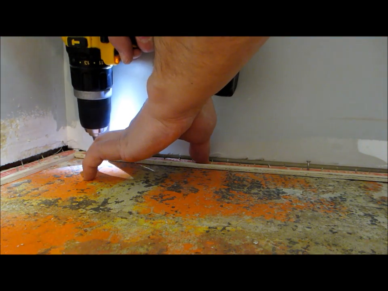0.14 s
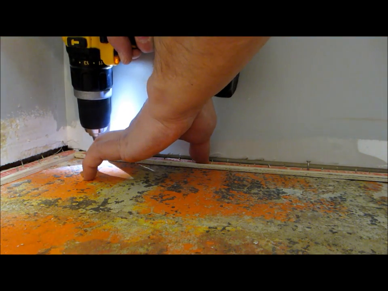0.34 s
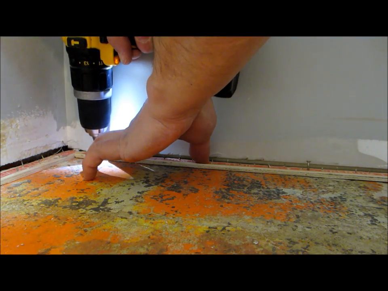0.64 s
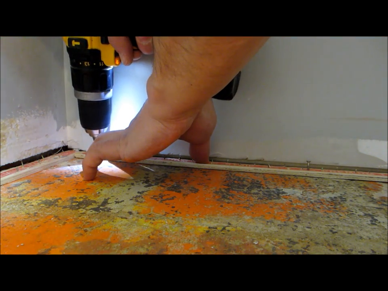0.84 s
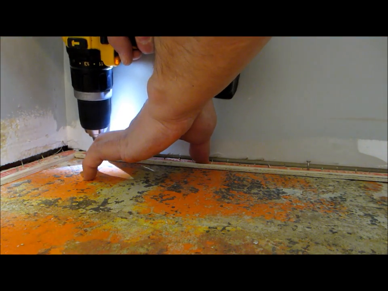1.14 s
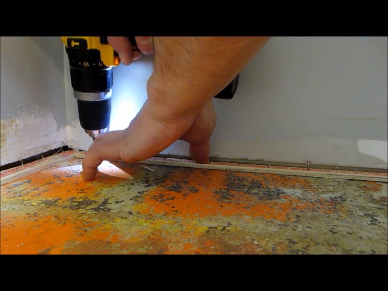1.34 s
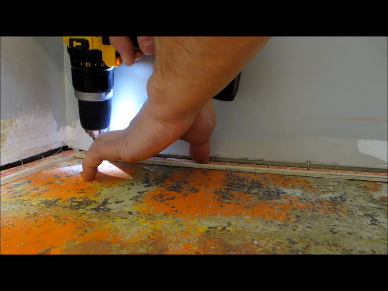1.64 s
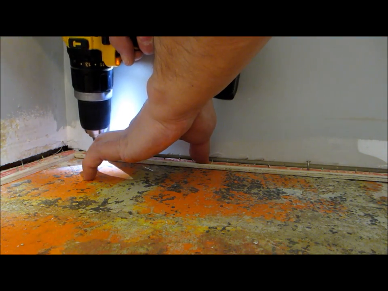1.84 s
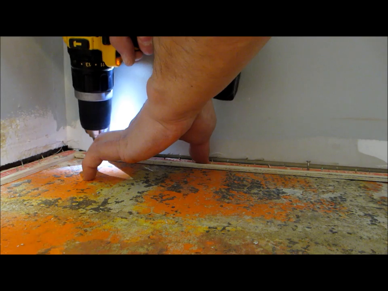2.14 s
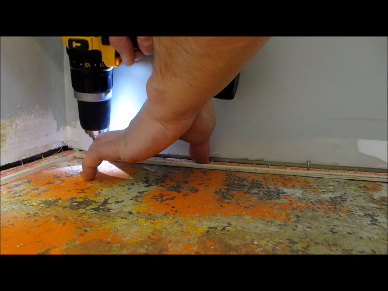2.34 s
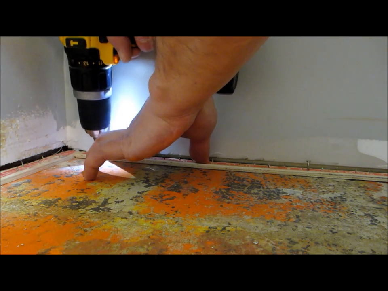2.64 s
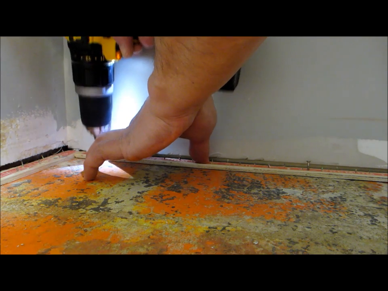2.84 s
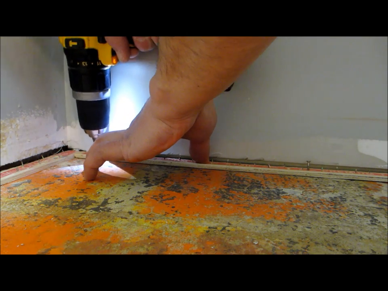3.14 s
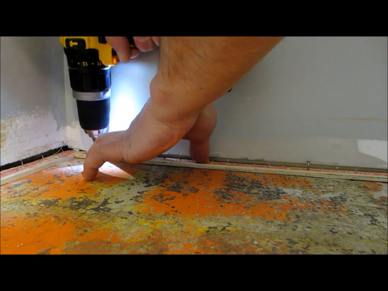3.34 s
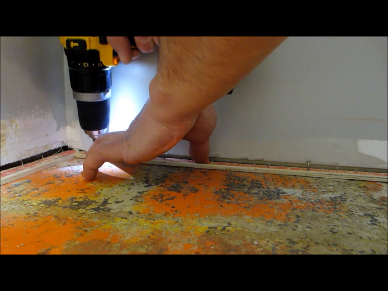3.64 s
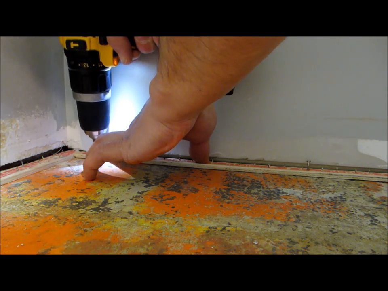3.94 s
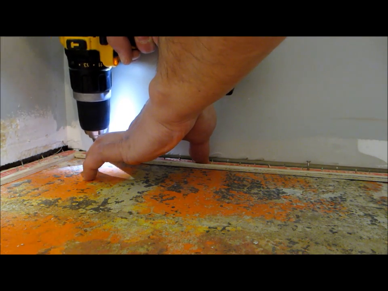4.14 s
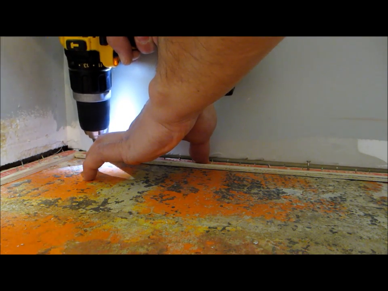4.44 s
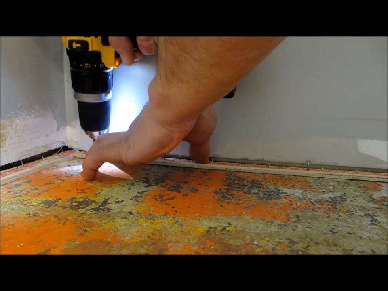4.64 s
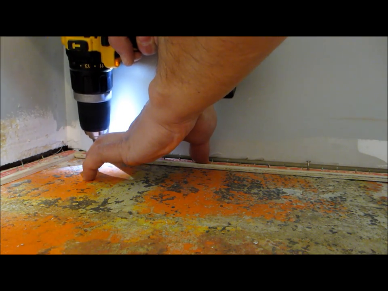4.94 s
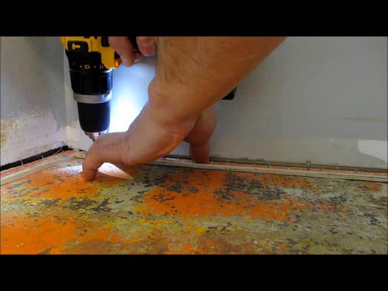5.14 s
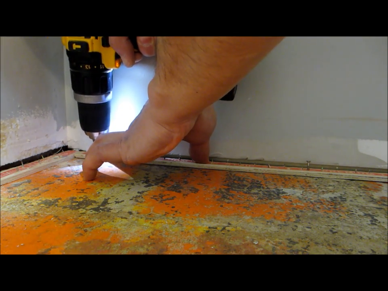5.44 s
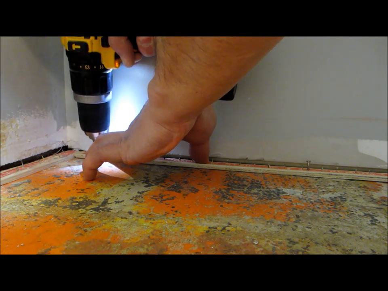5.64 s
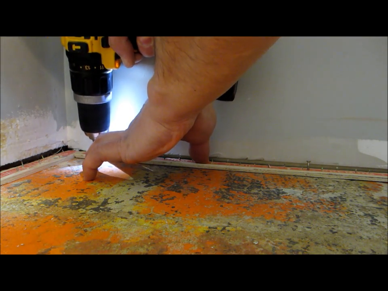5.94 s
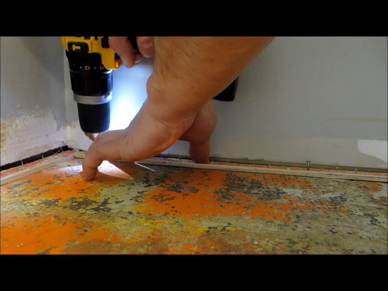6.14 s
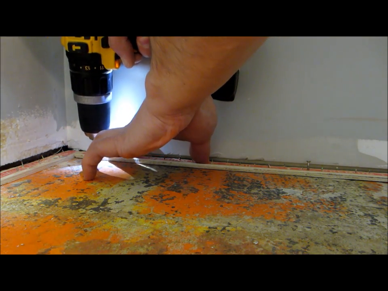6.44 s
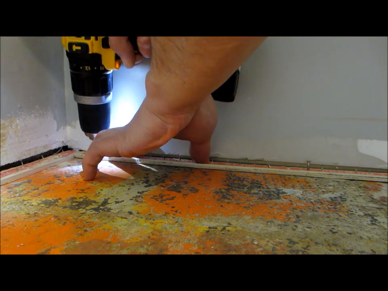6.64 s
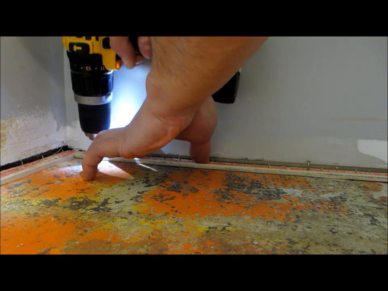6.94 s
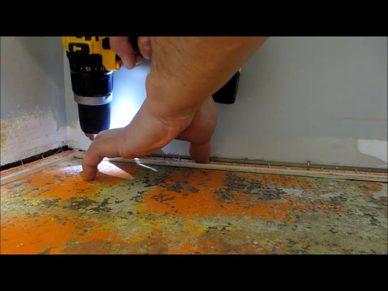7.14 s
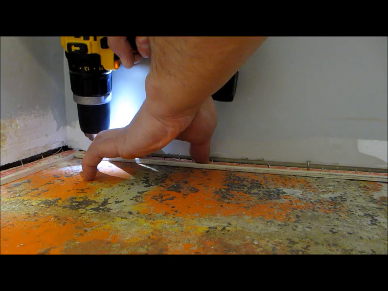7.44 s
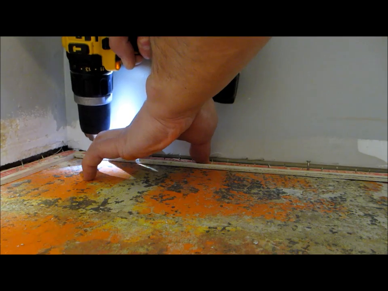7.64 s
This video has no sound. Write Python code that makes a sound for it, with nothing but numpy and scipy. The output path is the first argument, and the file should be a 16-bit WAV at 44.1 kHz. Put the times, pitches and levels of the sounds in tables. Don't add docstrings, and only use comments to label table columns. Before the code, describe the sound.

A cordless hammer drill grinds into a concrete floor very close to the microphones, a dense metallic buzz with chuck rattle and gritty hiss, wobbling quickly with each turn. After about two and a half seconds it lifts, leaving a thin rising motor whine, then bites again faster and rougher, settling to its earlier pitch amid dull irregular knocks. The small bare room adds a short bright reverberation.

```python
import sys
import numpy as np
from scipy import signal
from scipy.fft import rfft, irfft
from scipy.io import wavfile
from scipy.ndimage import uniform_filter1d

SR = 44100
rng = np.random.default_rng(int(sys.argv[2]) if len(sys.argv) > 2 else 0)


def file_out(sig):
    cols = np.atleast_2d(sig).T
    lim = np.clip(cols, -1, 1)
    pcm = np.round(lim * 32767).astype(np.int16)
    wavfile.write(sys.argv[1], SR, pcm)


def volts(x):
    e = np.asarray(x, float) / 20
    return 10 ** e


N = 343538

LIFT_S, BITE_S = 2.59, 2.995
TEETH = 17


def in_time(tables):
    s, *columns = np.transpose(np.vstack(tables))
    return [np.interp(np.arange(N) / SR, s, c) for c in columns]


def at_hz(points, hz):
    p = np.array(points, float)
    return np.interp(np.log(hz + 20), np.log(p[:, 0] + 20), p[:, 1])


def shaped(x, spectrum):
    gain = volts(at_hz(spectrum, np.fft.rfftfreq(N, 1 / SR)))
    return irfft(rfft(x) * gain, N)


def filtered(x, order, hz, kind):
    return signal.sosfilt(signal.butter(order, hz, kind, fs=SR, output="sos"), x)


def evened(x):
    return x / np.sqrt(uniform_filter1d(x ** 2, size=SR // 6) + 1e-12)


def drift(rate_hz):
    r = np.exp(-2 * np.pi * rate_hz / SR)
    slow = signal.lfilter([1], [1, -2 * r, r * r], rng.standard_normal(N + SR))[SR:]
    return slow / slow.std()


def fade_db(db_per_s):
    t = np.arange(N) / SR
    return -db_per_s * (t - LIFT_S) * (t > LIFT_S) * (t < BITE_S)


# frequency in Hz, room level against the direct sound in dB.
ECHO = [(100, -13), (1000, -18), (2000, -11), (4000, -7), (8000, -6), (16000, 0)]


def room(x, t60_s, count=3):
    t = np.arange(SR // 3) / SR
    wet = shaped(x, ECHO)
    mix = np.array([drift(1.94) for _ in range(count)])
    mix = mix / np.sqrt(np.mean(mix ** 2, axis=0))
    out = 0
    for weight in mix:
        tail = rng.standard_normal((2, len(t))) * volts(-60 * t / t60_s) * (t > .003)
        tail = tail / np.sqrt(count * np.sum(tail ** 2, axis=1, keepdims=True))
        out = out + signal.oaconvolve((wet * weight)[None], tail, axes=1)[:, :N]
    return out


# frequency in Hz, lead of the left in radians.
PORT_PHASE = [(0, -1.5), (430, -1.38), (1290, -1.24), (1980, 0.64), (6290, -0.02), (7580, 1), (8440, -1.4),
              (9390, 0.94), (9820, 0), (11000, 1.5), (11600, 1.0), (13800, 2), (14300, 1.64), (16000, 2.5)]
# frequency in Hz, left minus right in dB.
PORT_BALANCE = [(60, -1), (110, 19), (200, 11), (380, 11.0), (700, 7.5), (1290, 0.5), (2380, 1),
                (4400, 0.5), (8120, -3), (15000, -1)]


def ports(x):
    hz = np.fft.rfftfreq(N, 1 / SR)
    left = volts(at_hz(PORT_BALANCE, hz) / 2) * np.exp(.5j * at_hz(PORT_PHASE, hz))
    pair = np.array([left, 1 / left])
    return irfft(rfft(x) * pair / np.abs(pair.mean(axis=0)), N)


# frequency in Hz, level in dB per Hz.
IDLE = [(90, -20), (150, -30), (290, -16), (350, -3), (500, -12), (680, -3), (1230, 0), (1500, -6),
        (2800, -5), (4300, -13), (5600, -9), (8000, -10), (11000, -6), (16000, -17)]
# time in seconds, tooth mesh tone in Hz, level in dB.
WHINE = [
    (2.66, 5600, -80),
    (2.74, 5700, -54),
    (2.83, 5860, -53),
    (2.92, 5945, -53.5),
    (2.99, 5980, -55),
    (3.01, 5980, -80),
]
# multiple of the mesh tone, level in dB.
MESH = [(.872, -2), (.944, -4), (1, 0), (1.818, 0), (1.888, -4), (2, -1)]


def motor():
    mesh_hz, mesh_db = in_time([WHINE])
    noise = shaped(rng.standard_normal(N), IDLE)
    turn = 2 * np.pi * np.cumsum(mesh_hz * (1 + .0003 * drift(30.0))) / SR
    tones = 0
    for k, level_db in MESH:
        tones = tones + volts(level_db + 1 + drift(8.0)) * np.sin(k * turn)
    return volts(-41.5) * noise / noise.std() + volts(mesh_db) * tones


# start and end in seconds, rumble in dB at the start and at the end.
CHATTER = [
    (3.37, 4.423, -44, -44.5),
    (4.627, 5.765, -34.5, -46.5),
    (6.35, 7.3, -55.5, -47),
    (7.546, 7.8, -58, -44),
]


def chatter_db():
    quiet_db, edge_s = -73, 0.06
    rows = []
    for a, b, a_db, b_db in CHATTER:
        rows.append([(a - edge_s, quiet_db), (a, a_db), (b, b_db), (b + edge_s, quiet_db)])
    return in_time(rows)[0]


# time in seconds, peak in dB.
KNOCKS = [(3.395, -25), (3.486, -21), (3.564, -21), (3.601, -29), (3.726, -31), (3.769, -29), (3.808, -32),
          (3.857, -28), (3.935, -19), (4.019, -25), (4.163, -30), (4.222, -30), (4.271, -25), (4.384, -40),
          (4.557, -24), (4.637, -22), (4.685, -27), (4.723, -33), (4.795, -25), (4.968, -34), (5.105, -27),
          (5.194, -20), (5.281, -29), (5.324, -42), (5.403, -36), (5.478, -22), (5.62, -25), (5.707, -27),
          (6.393, -36), (6.925, -35), (7.032, -27), (7.071, -25), (7.161, -25), (7.243, -23),
               (7.588, -34), (7.699, -34)]


def knocks(turn):
    lag_s = .009
    set_down = [(BITE_S - .012, -38)]
    out, t = np.zeros(N + SR), np.arange(SR // 10) / SR
    turns = np.flatnonzero(np.diff(turn // (2 * np.pi)) > 0)
    taps_db = chatter_db()[turns] + 8.5 + 8 * rng.standard_normal(len(turns))
    hits = KNOCKS + set_down + list(zip(turns / SR, taps_db))
    for (s, peak_db), chance in zip(hits, rng.random((len(hits), 2))):
        click = np.sin(2 * np.pi * (185 + 150 * chance[0]) * t) * np.exp(-(t / 0.006) ** 2)
        ring = 0.43 * chance[1] * np.sin(2 * np.pi * 205 * t) * np.exp(-t / 0.035)
        i = round((s + lag_s) * SR)
        out[i:i + len(t)] += volts(peak_db - 3.0) * (click + ring)
    return out[:N]


# time in seconds, share of a full blow from 0 to 1.
SKIPPED = [
    (2.9, .1),
    (3.0, .85),
    (3.14, .9),
    (3.16, 0),
    (3.4, 0.15),
    (3.55, 0.05),
]


def skipped_share():
    return np.clip(in_time([SKIPPED])[0], 0, 1)


def blows(teeth, wobble, spread_db, jitter_s, scrape):
    count = np.arange(1, int(teeth[-1]))
    draw = rng.standard_normal((len(count), 2))
    at = np.interp(count, teeth, np.arange(N)) + draw[:, 0] * jitter_s * SR
    at = np.clip(at, 0, N - 2)
    i = at.astype(int)
    size = np.where(count % 2, skipped_share()[i], 1) * volts(spread_db * draw[:, 1])
    clicks = np.zeros(N)
    np.add.at(clicks, i, size * (1 - at + i))
    np.add.at(clicks, i + 1, size * (at - i))
    return wobble * (clicks + scrape * rng.standard_normal(N) / np.sqrt(SR / 200))


def resonate(x, modes):
    out = 0
    for hz, width_hz, level_db in modes:
        r = np.exp(-np.pi * 1.5 * width_hz / SR)
        stage = [(1 - r * r) / 2, 0, -(1 - r * r) / 2, 1, -2 * r * np.cos(2 * np.pi * hz / SR), r * r]
        out = out + volts(level_db) * signal.sosfilt([stage, stage], x)
    return out


# frequency in Hz, width in Hz, level in dB.
CHUCK = [(1723, 218, 8), (2028, 158, 8.5), (2201, 215, 7.5), (2658, 270, 1), (2877, 610, -3.5)]
# frequency in Hz, level in dB per Hz.
GRIT = [(2800, -18), (3500, -5), (5000, -9.5), (6700, -11.5), (7200, -4.5), (7700, -8), (8800, -4),
        (9400, 3.5), (9900, -1), (10500, 1), (12500, -5.5), (13400, -5), (14600, -12.5), (16000, -5.5)]
# frequency in Hz, level in dB per Hz.
SCRAPE = [(120, -45), (330, -16), (430, -5), (600, -1), (800, -1), (1000, 1.5), (1230, 6), (1400, 2.5),
          (1500, -20), (1800, -16.5)]
# time in seconds, half length in seconds, gain in dB.
BINDS = [
    (1.6, .18, 2.5),
    (2.568, .04, 0.5),
    (4.64, 0.15, 3.5),
    (7.2, 0.38, 2),
]


def grind(rate, teeth, turn, wobble):
    eased = np.clip((rate - 200) / 6, -1, 1)
    clear_s = 2.685
    clear = in_time([[(clear_s - .015, 0), (clear_s + .035, 1), (BITE_S, 1), (BITE_S + .001, 0)]])[0]
    fade = fade_db(57) - 10 * clear
    bind_db = 0
    for s, half_s, gain_db in BINDS:
        bind_db = bind_db + gain_db * np.exp(-((np.arange(N) / SR - s) / half_s) ** 2)
    scrape_db = -28 + 1.5 * eased + fade + .8 * bind_db
    rattle_db = -29.5 + 0.46 * eased + fade + bind_db
    grit_db = -29 + eased + fade + fade_db(92)
    rumble_db = chatter_db() + fade + 1.5

    strikes = blows(teeth, wobble ** 0.068, spread_db=2.0, jitter_s=.00005, scrape=1.0)
    rattle = filtered(resonate(strikes, CHUCK), 4, 4200, "low")

    swell = 1 + 0.24 * np.cos(np.pi * teeth - .6) + 0.099 * np.cos(2 * np.pi * teeth - .6)
    hiss = shaped(rng.standard_normal(N), GRIT) * swell * wobble ** 0.34 * volts(1.5 * drift(130.0))
    fine = filtered(hiss, 2, [10200, 12800], "band")
    hiss = hiss + 0.18 * eased * fine

    pulse = 1 + 0.067 * np.cos(np.pi * teeth)
    scrape = shaped(rng.standard_normal(N) * pulse * wobble ** 0.077, SCRAPE)

    bumps = rng.standard_normal(N) * volts(2.2 * np.cos(2 * turn) + 4.4 * drift(30.0))
    rumble = filtered(bumps, 2, [110, 340], "band")
    return (volts(grit_db) * evened(hiss) + volts(rattle_db) * evened(rattle)
            + volts(scrape_db) * evened(scrape) + volts(rumble_db) * evened(rumble))


# frequency in Hz, width in Hz, level in dB.
BODY = [(390.5, 20, -41), (439.3, 47, -32), (600.6, 24, -30.5), (640, 48, -32.5), (824, 40.7, -30),
        (910, 47, -31), (1007, 150, -27), (1078, 47, -20), (1181.6, 59, -23.5), (1249, 60, -20.5),
        (1292, 40, -22.5), (1353, 44, -25.5), (1394.3, 34, -32), (1520, 57, -32)]


def body_db(hz):
    grid = np.arange(300, 1800)
    power = 0
    for mode_hz, width_hz, level_db in BODY:
        power = power + volts(2 * level_db) / (1 + (2 * (grid - mode_hz) / width_hz) ** 2) ** 2
    return np.interp(hz, grid, 10 * np.log10(power))


# time in seconds, blow pairs per second.
SPEED = [(0.0, 205.6), (0.7, 204.4), (1.22, 204.2), (1.4, 199.9), (1.68, 202.0), (1.8, 200.2), (1.9, 195.8),
         (2.0, 200.4), (2.35, 198.0), (2.6, 200.2), (3.0, 200.0), (3.97, 202.2), (4.12, 207.2),
         (4.52, 205.6), (4.7, 200.2), (5.05, 198.2), (5.75, 199.9), (7.79, 199.0)]
# time in seconds, extra blow pairs per second.
OVERSPEED = [
    (2.6, 0),
    (3.0, 35),
    (3.03, 31),
    (3.12, 27),
    (3.17, 23),
    (3.29, 21.6),
    (3.62, 6.2),
    (3.8, 4.0),
    (3.97, 0),
]


def speed():
    return in_time([SPEED])[0] + in_time([OVERSPEED])[0] + .8 * drift(5.0)


GRIP = [1.2, .2, .7, .9, 1.4, 1.2]
WANDER_DB = [.5, .7, .5, .7, .6, 1.2]
LEAN_SHARE = [0.15, 0.061, 0.49, -0.52, 0.83, 0]
# time in seconds, lean in dB.
LEAN = [(0, -4), (.2, 2), (.42, -1.5), (.8, -3), (1.2, -4), (1.4, 3), (1.6, 3), (1.8, 2), (2.5, 0),
        (3.43, -5.5), (3.75, -1), (3.95, -7), (4.15, 0.5), (4.35, 0.5), (4.6, 0.7), (5.7, 0), (7.79, .1)]


def hammer(rate, teeth, turn, wobble):
    share, lean_db = skipped_share(), in_time([LEAN])[0]
    pair_db = 20 * np.log10([1 + 1.35 * share, 1.03 - share])
    levels_db = []
    for k, wander_db in enumerate(WANDER_DB, 2):
        level_db = body_db(k * rate) + pair_db[k % 2] + fade_db(209)
        levels_db.append(level_db + wander_db * drift(1.9) + LEAN_SHARE[k - 2] * lean_db)
    clamp_s = 7.7
    levels_db[2] = levels_db[2] + 10 * in_time([[(clamp_s - .03, 0), (clamp_s, 1)]])[0]

    pair = np.pi * teeth + .03 * drift(50.0) + .06 * np.sin(turn)
    lifted = in_time([[(LIFT_S - .09, 0), (LIFT_S - .04, 1), (BITE_S - .1, 1), (BITE_S, 0)]])[0]
    pair = pair + .22 * (share + lifted) * drift(25.0)

    size = wobble * volts(0.13 * drift(33.0))
    out = volts(levels_db[1] - 16.5 + 1.5 * drift(4.0)) * np.sin(np.pi * teeth)
    for k, level_db in enumerate(levels_db, 2):
        bite = evened(size ** GRIP[k - 2])
        loudness = np.sqrt(2) * volts(level_db + 0.8 + 0.8 * drift(30.0))
        out = out + loudness * bite * np.cos(k * pair + 0.24 * (k - 5.5) ** 2)
    return out


def scene():
    rate = speed()
    teeth = 2 * np.cumsum(rate) / SR
    turn = 2 * np.pi * teeth / TEETH + 0.18 * drift(1.7) + 0.97
    slip_db = 5.5 + .8 * drift(3)
    wobble = volts(-slip_db * np.exp(1.6 * (np.cos(turn) - 1)) + 0.3 * drift(8.1))
    biting = in_time([[(0, 1), (2.76, 1), (2.82, 0), (2.994, 0), (2.997, 1)]])[0]
    work = hammer(rate, teeth, turn, wobble) + grind(rate, teeth, turn, wobble)
    drill = biting * work + motor() + knocks(turn)
    return ports(drill) + room(drill, t60_s=0.2)


def low_pass(x):
    return signal.sosfilt(signal.butter(12, 16410, fs=SR, output="sos"), x)


def record(dry):
    x = filtered(dry, 2, 100, "high")
    x = signal.sosfilt(signal.ellip(12, .5, 70, 15720, fs=SR, output="sos"), x)
    return low_pass(x)


dry = scene()
out = record(dry)
file_out(out)
```